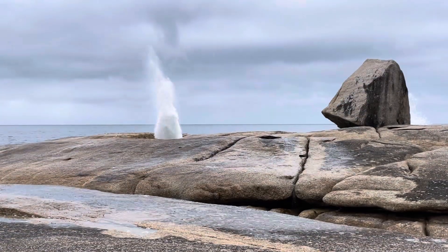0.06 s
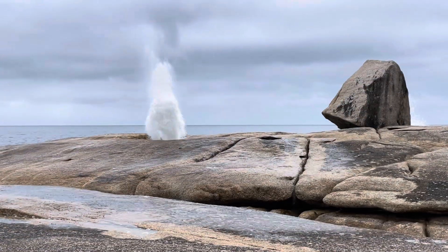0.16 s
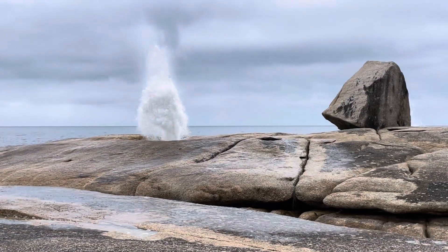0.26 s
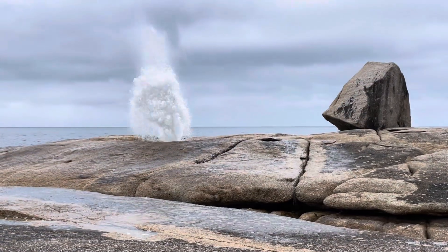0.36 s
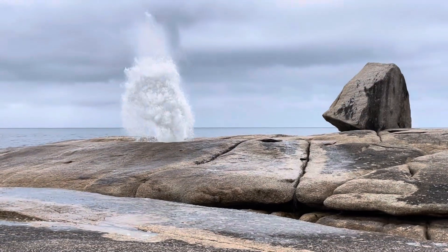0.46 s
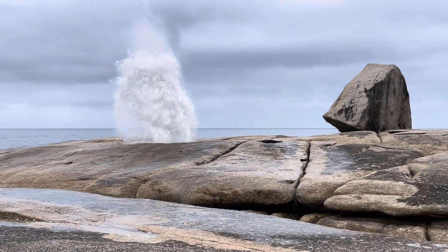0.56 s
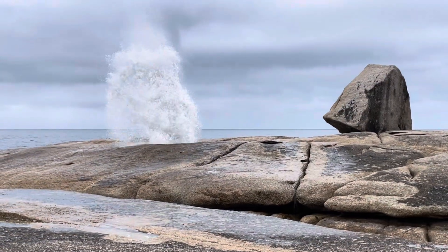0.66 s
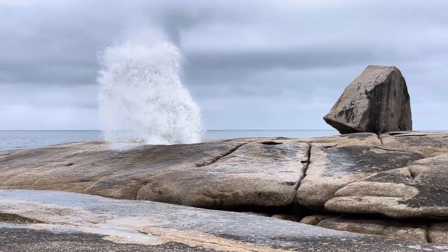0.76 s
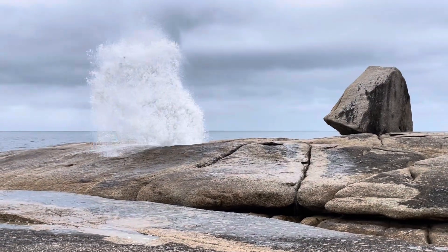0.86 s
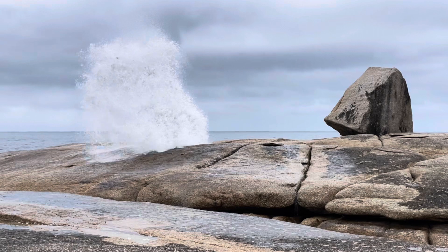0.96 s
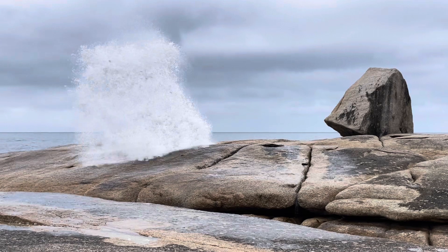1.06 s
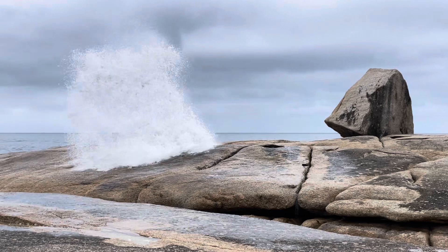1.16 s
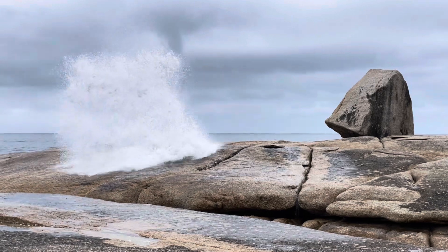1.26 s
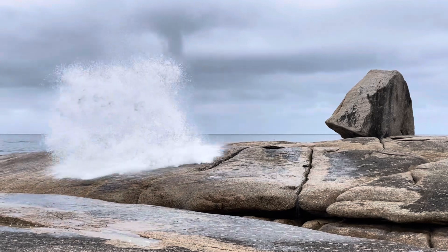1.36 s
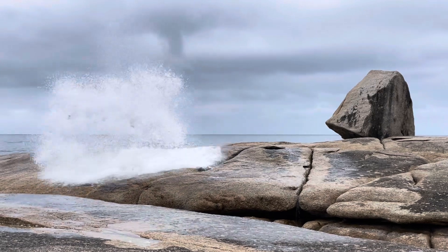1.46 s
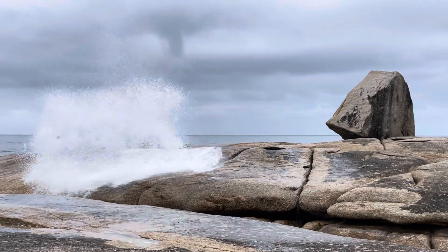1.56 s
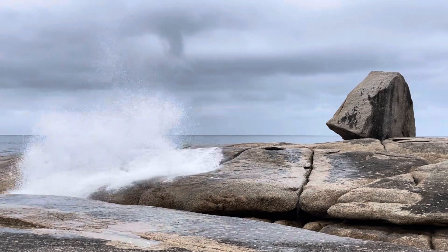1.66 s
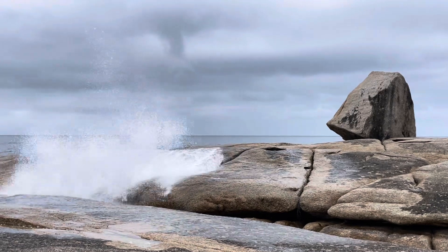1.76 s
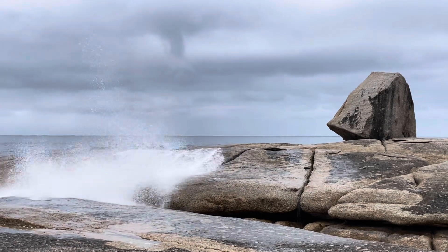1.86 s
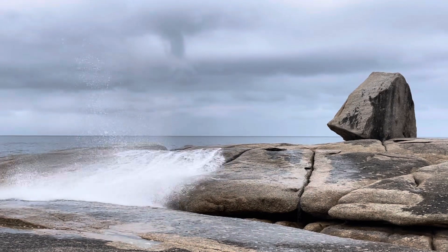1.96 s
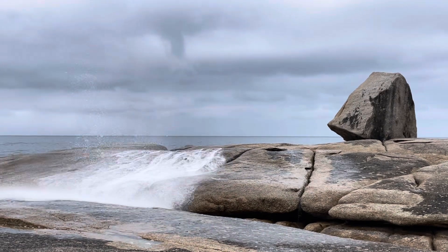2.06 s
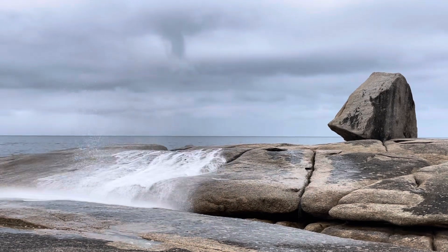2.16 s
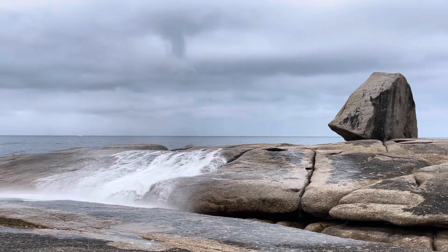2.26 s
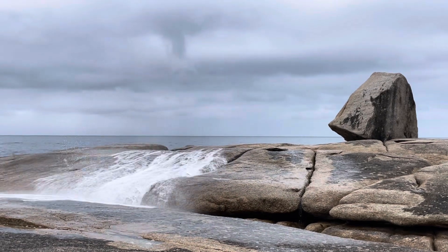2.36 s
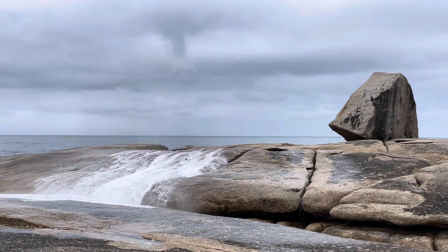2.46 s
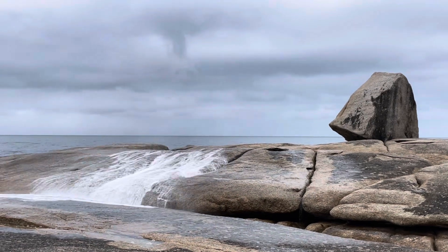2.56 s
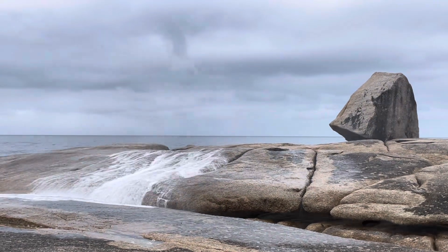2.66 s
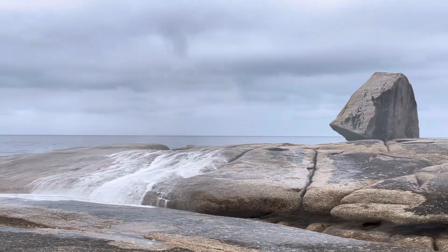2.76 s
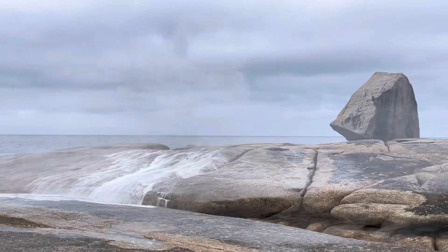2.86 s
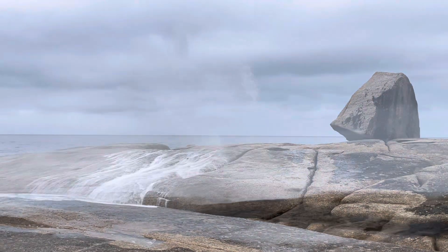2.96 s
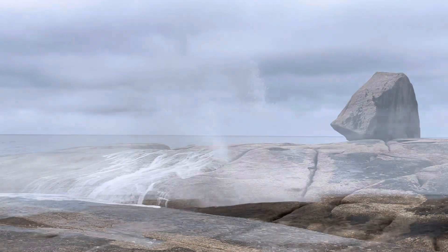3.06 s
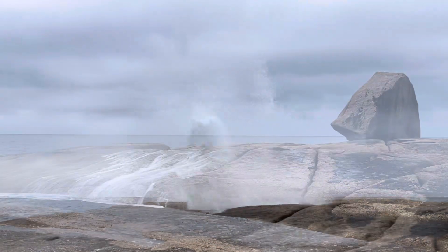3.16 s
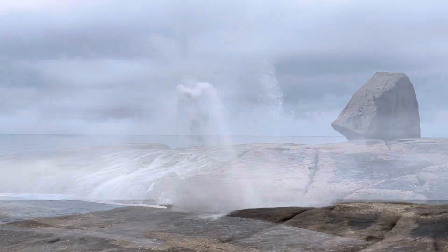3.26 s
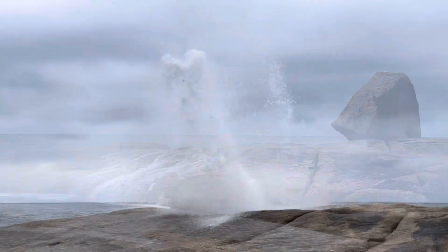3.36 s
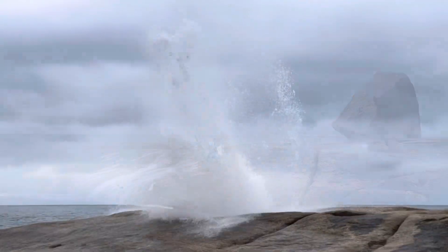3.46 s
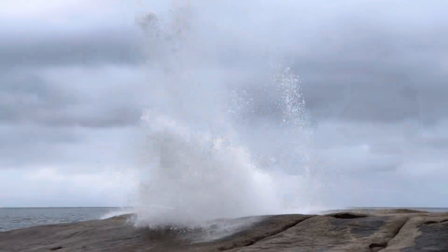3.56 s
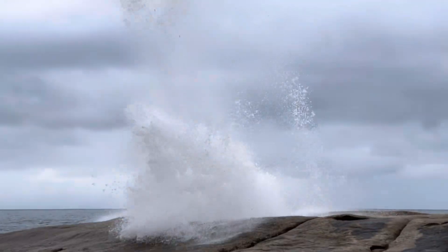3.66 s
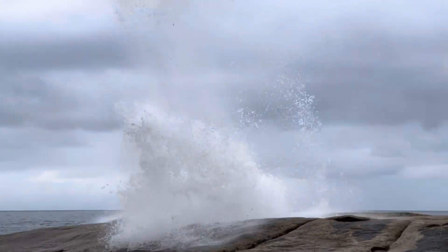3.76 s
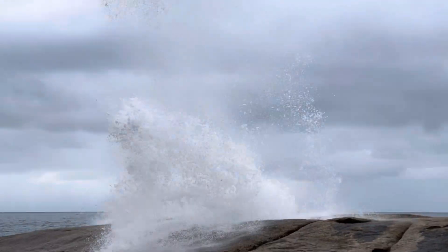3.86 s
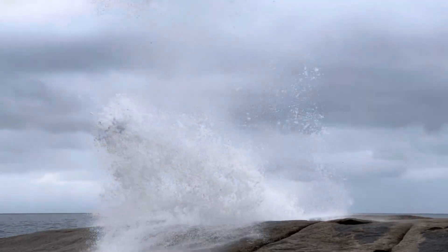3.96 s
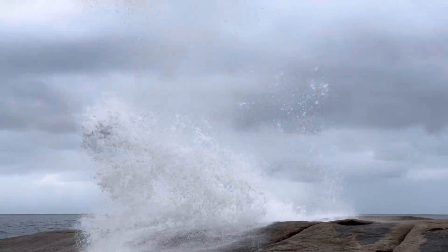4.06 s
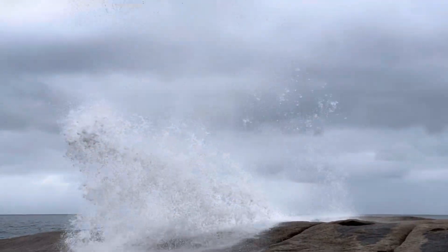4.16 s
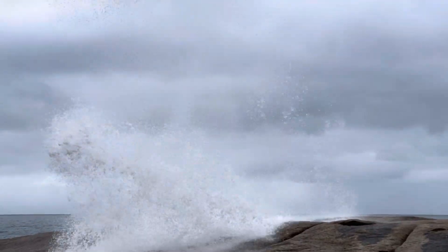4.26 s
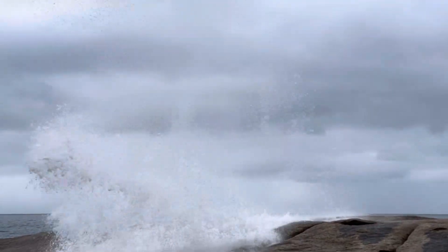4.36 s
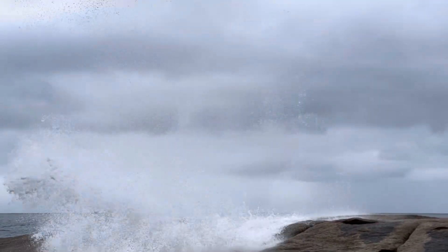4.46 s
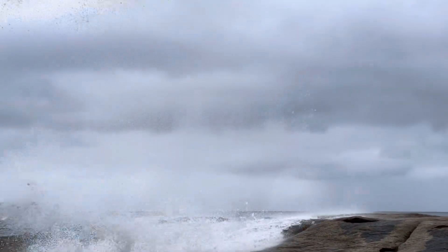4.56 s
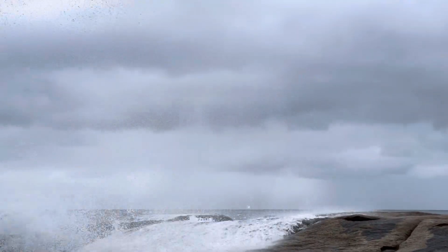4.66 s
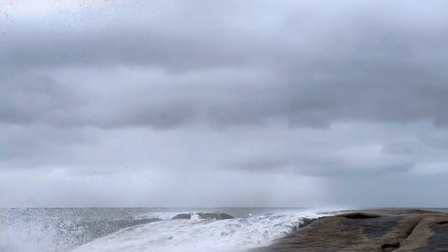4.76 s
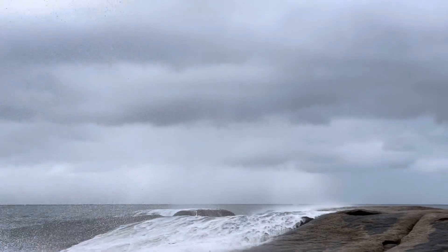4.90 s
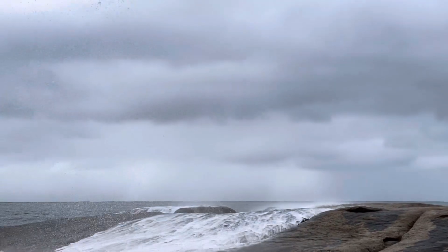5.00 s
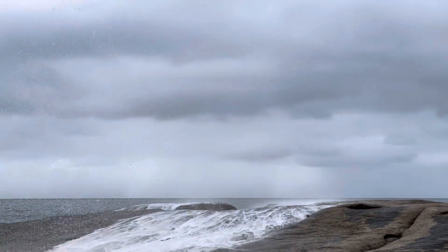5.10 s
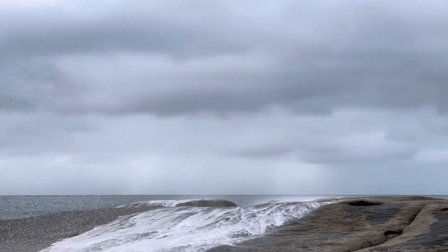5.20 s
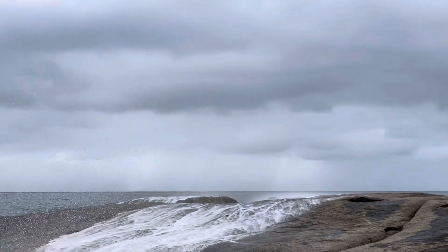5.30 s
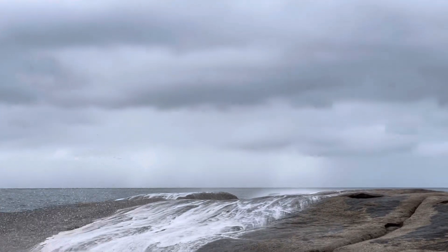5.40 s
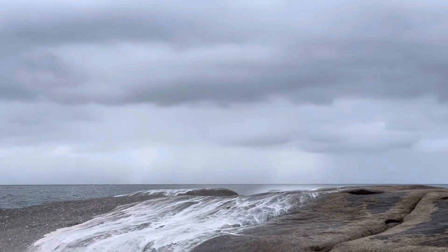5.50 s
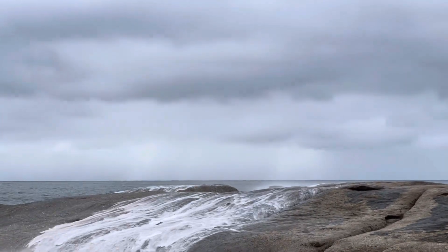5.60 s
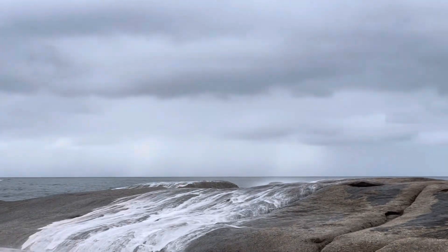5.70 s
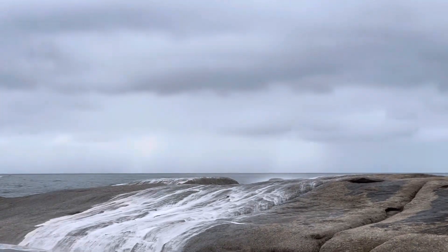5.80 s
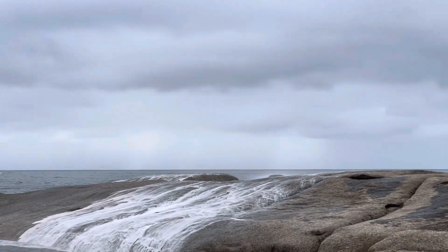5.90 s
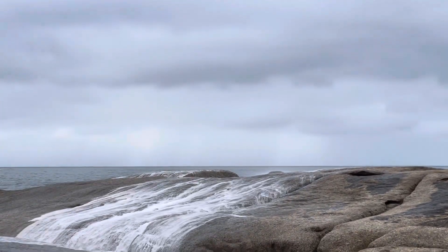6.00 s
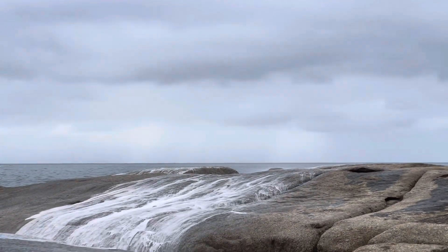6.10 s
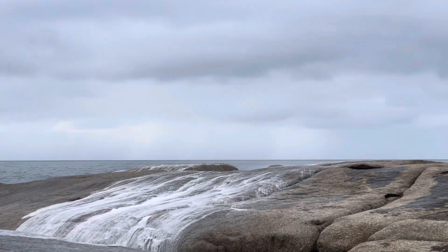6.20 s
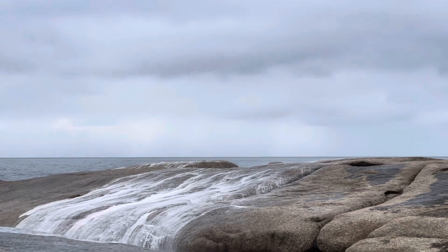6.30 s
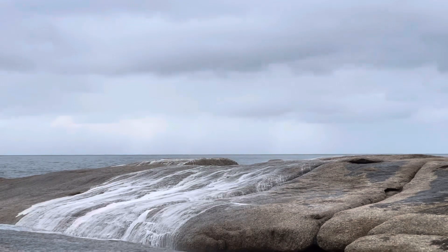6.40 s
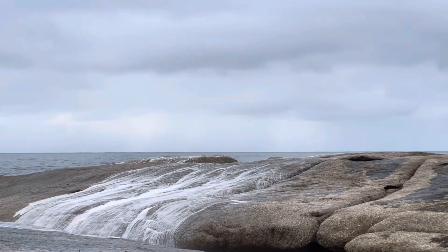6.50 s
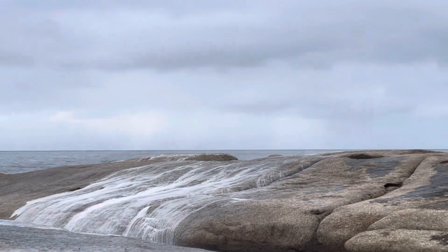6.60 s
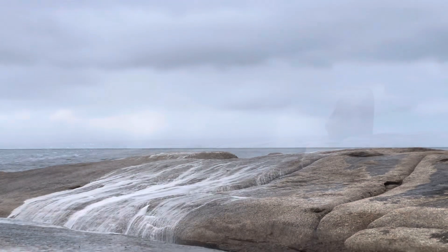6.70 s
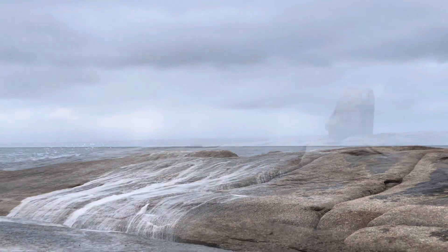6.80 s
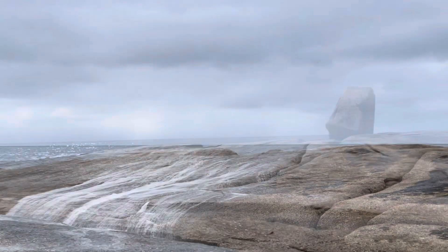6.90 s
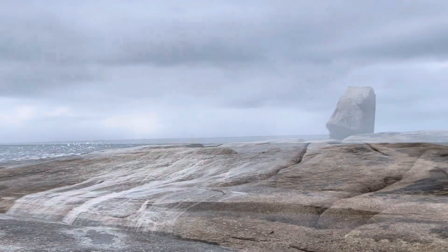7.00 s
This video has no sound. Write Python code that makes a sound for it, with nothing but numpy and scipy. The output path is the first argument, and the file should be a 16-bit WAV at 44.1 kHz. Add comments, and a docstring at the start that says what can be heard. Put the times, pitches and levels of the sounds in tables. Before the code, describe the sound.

Distant surf roars softly under low wind thuds. A surge booms in a rock cleft, then thrown water falls as heavy slaps, coarse patter and bright hiss before draining. After a gusty lull another surge rumbles, air pockets gulp, and a broad splash comes down. Foamy run-off fades with a few crisp close drops. Outdoors, closely spaced stereo microphones, no echo.

```python
"""Blowhole on a granite shore

A blowhole spouts twice over the roar of the sea, which is shaped noise that slowly eases off.
Surges rumble in the cleft; lumps slap down, drops spatter and fine spray hisses, as noise mixed with
clicks and ringing bubbles. Foam fizzes, run-off drains away, air gulps and single fat drops smack the rock.
Gusts of low noise buffet a closely spaced pair of microphones."""
import sys
import numpy as np
from scipy import signal
from scipy.fft import rfft, irfft, next_fast_len
from scipy.io import wavfile
from scipy.ndimage import uniform_filter1d

SR = 44100
rng = np.random.default_rng(int(sys.argv[2]) if len(sys.argv) > 2 else 0)


def digitize_waveform(pressure):
    """Quantize a signal to 16-bit integers and store it at the path in sys.argv[1].

    Rows of a 2-D input are taken as channels; values are limited to [-1, 1].
    """
    field = np.atleast_2d(pressure).T
    bounded = np.clip(field, -1, 1)
    quanta = np.round(bounded * 32767).astype(np.int16)
    wavfile.write(sys.argv[1], SR, quanta)


N = 310596
STEP_S = .002
CLOCK = np.arange(0, N / SR + STEP_S, STEP_S)   # the times at which levels are worked out, in seconds


def from_db(db):
    """Decibels to gain."""
    return 10 ** (np.asarray(db) / 20)


def to_db(power):
    """A power on the clock to decibels at every sample."""
    return np.interp(np.arange(N) / SR, CLOCK, 10 * np.log10(power + 1e-12))


def rms_one(x):
    """Scale to unit power."""
    return x / np.sqrt(np.mean(x ** 2) + 1e-20)


def per_bin(points):
    """A table over log frequency, read at every FFT bin."""
    hz, value = np.transpose(points)
    bin_hz = np.fft.rfftfreq(next_fast_len(N), 1 / SR)
    return np.interp(np.log(bin_hz + 1), np.log(hz), value)


def filtered(x, response):
    """Apply a frequency response."""
    size = next_fast_len(N)
    return irfft(rfft(x, size) * response, size)[..., :N]


def coloured(x, spectrum):
    """Filter a sound by a spectrum in dB, then scale to unit power."""
    return rms_one(filtered(x, from_db(per_bin(spectrum))))


def drift(rate):
    """Smooth chance of spread 1 that changes about rate times a second."""
    hold = 40   # samples between slow points
    r = np.exp(-2 * hold * np.pi * rate / SR)
    noise = rng.standard_normal(N // hold + 2002)
    slow = signal.lfilter([1], [1, -2 * r, r * r], noise)[2000:]   # skip the filter's settling
    return np.interp(np.arange(N) / hold, np.arange(len(slow)), rms_one(slow))


def swell(peak_s, rise_s, fall_s, hold_s=0):
    """Power that rises to 1, holds and dies away; it is 10 dB down after rise_s or fall_s."""
    shape = 1.53   # 1 = pointed top, 2 = bell
    t = CLOCK - peak_s
    away = np.maximum(-t / rise_s, 0) + np.maximum((t - hold_s) / fall_s, 0)
    return 10 ** -np.minimum(away ** shape, 20)


def wash():
    """Two unrelated noises: countless events merged."""
    return rng.standard_normal((2, N))


def ring(clicks, hz, t60):
    """Each click sets a sine ringing that falls 60 dB in t60 seconds; a unit click starts it at height 1."""
    r = np.exp(-np.log(1000) / (t60 * SR))
    w = 2 * np.pi * min(hz, SR / 2 - 1) / SR
    return signal.lfilter([0, np.sin(w)], [1, -2 * r * np.cos(w), r * r], clicks + 1e-18)


def impacts(per_s, spread_db):
    """Two unrelated rains of clicks: many small, a few large."""
    sizes = from_db(spread_db * np.minimum(rng.exponential(1, (2, N)), 4))
    signs = rng.choice([-1, 1], (2, N))
    return sizes * signs * (rng.random((2, N)) < per_s / SR)


def bubbles(per_s, spread_db, low_hz, high_hz, cycles, count):
    """Impacts trap air: each rings for some cycles at one of many pitches."""
    clicks = impacts(per_s, spread_db)
    dealt = rng.integers(0, count, N)   # which pitch each click gets
    pitches = np.geomspace(low_hz, high_hz, count)
    return rms_one(sum(hz * ring(clicks * (dealt == k), hz, cycles / hz) for k, hz in enumerate(pitches)))


def sea():
    """Distant surf: noise of falling spectrum, slowly heaving and easing off."""
    # Each row: frequency in Hz, relative level in dB per Hz.
    surf_spectrum = [(50, -11), (100, 0), (170, 2), (280, -6.5), (450, -16), (800, -17), (1200, -21.5),
                     (1800, -26), (3000, -28), (4800, -55), (8000, -75), (13500, -45), (16000, -59)]
    start_db, eases_db_per_s = -43.5, 0.28
    level_db = start_db - eases_db_per_s * np.arange(N) / SR + 0.26 * drift(0.16)
    return coloured(wash(), surf_spectrum) * from_db(level_db)


def cleft():
    """Air and water churn in the rock channel with each surge."""
    # Spectrum of the churn. Each row: frequency in Hz, relative level in dB per Hz.
    rumble_spectrum = [(50, -9), (100, 5), (160, 4.5), (280, 1.5), (450, -1.5), (700, -7), (950, -13.5),
                       (1400, -22), (2500, -31), (8000, -85)]
    # Waves surge through. Each row: peak in seconds, level in dB, rise and fall in seconds over 10 dB.
    surges = [(0.03, -37.5, 0.33, 2.4), (1.0, -33.5, 0.26, 0.58), (1.64, -37, 0.13, 3.5),
              (3.401, -35.5, 0.12, 1.1), (4.17, -32, 0.46, 0.94), (5.25, -36, 1, 2.3)]
    level_db = to_db(sum(from_db(db) ** 2 * swell(s, rise, fall) for s, db, rise, fall in surges))
    return coloured(wash(), rumble_spectrum) * from_db(level_db + .5 * drift(36))


def wind_level():
    """Short gusts ride on an unsteady breeze that slowly eases; dB."""
    # Gusts hit the microphones. Each row: start of full strength in seconds, its length in seconds, level in dB.
    gusts = [(0.005, 0.016, -25.5), (0.057, 0.027, -31.5), (0.352, 0.039, -35), (0.473, 0.045, -41),
             (0.734, 0.022, -34), (0.872, 0.23, -42.5), (1.147, 0.052, -34), (1.219, .03, -29),
             (1.638, .03, -34), (1.778, 0.027, -39), (2.11, .035, -35), (2.935, .1, -32.5),
             (3.04, .022, -28), (3.074, .05, -29), (3.152, .08, -32), (3.26, .025, -38), (3.363, 0.46, -41),
             (4.155, 0.036, -36), (4.413, 0.029, -30), (4.485, 0.058, -35), (5.603, 0.051, -38.5),
             (6.043, 0.021, -37), (6.86, 0.06, -36.5)]
    attack_s, release_s = 0.0051, 0.014   # over 10 dB
    start_db, swing_db, eases_db_per_s = -45, 4.5, 0.4
    breeze_db = start_db + swing_db * drift(4.4) - eases_db_per_s * np.arange(N) / SR
    gusts_db = to_db(sum(from_db(db) ** 2 * swell(s, attack_s, release_s, length) for s, length, db in gusts))
    return 20 * np.log10(np.hypot(from_db(breeze_db), from_db(gusts_db)))


def wind():
    """Eddies thump on both ports at once; stronger gusts shed larger, deeper eddies."""
    # Spectrum of the small eddies. Each row: frequency in Hz, relative level in dB per Hz.
    buffet_spectrum = [(15, -35), (28, -38), (40, -1.5), (62, 16), (80, 10.5), (120, -8.5), (300, -31.5),
                       (2000, -100)]
    level_db = wind_level()
    small = coloured(wash(), buffet_spectrum)
    large = coloured(wash(), [(0.84 * hz, db) for hz, db in buffet_spectrum])
    eddies = small + large * from_db(1.5 * (level_db - level_db.max()) + 1.5)
    # even out the eddies' own ups and downs, so that the level follows the gusts
    swing = np.abs(signal.hilbert(eddies, next_fast_len(N))[:, :N])
    strength = np.sqrt(uniform_filter1d(swing ** 2 / 2, size=1800, axis=-1) + 1e-9)
    return eddies / strength * from_db(level_db)


def landing_water():
    """Levels of masses, drops, spray and foam in dB: the falls add up, then run off and leave foam."""
    # Thrown water comes down on the rock. Each row: peak in seconds, rise and fall in seconds over 10 dB,
    # then heavy masses, coarse drops and fine spray in dB.
    falls = [(0.87, 0.29, 0.25, -68, -49, -52.5), (0.94, 0.063, 0.74, -47, -43, -41.5),
             (1.25, 0.26, 0.54, -39, -41.5, -37), (1.52, 0.28, 0.27, -36, -39, -37),
             (1.85, 0.23, 0.31, -38, -36.5, -30.5), (2.01, 0.22, 0.215, -34.3, -43, -41),
             (2.17, .1, 0.098, -51, -48, -41), (2.44, 0.29, 0.23, -44.5, -66, -50.5),
             (2.62, 0.12, 0.083, -50, -54, -55.5), (3.27, 0.245, 0.62, -46.5, -50.5, -55),
             (3.62, 0.38, 0.95, -52, -47, -48), (4.31, 0.736, 0.76, -35.5, -40, -38.5),
             (4.76, 0.45, 0.49, -36, -39, -33.5), (4.848, 0.11, 0.11, -39, -38, -35),
             (5.429, 0.47, 0.25, -45.5, -40, -29), (5.65, 0.2, 0.11, -48.5, -51, -33.5),
             (5.79, 0.054, 0.035, -60, -59, -44)]
    # Water drains off the rock. Each row: peak in seconds, sloshing in dB, fizz in dB.
    run_off = [(0.25, -49, -55.5), (2.299, -48.5, -60.5), (5.75, -50.5, -62.5)]
    run_off_rise_s, run_off_fall_s = 0.88, 1.57   # over 10 dB
    run_off_drops_db = -7.5   # relative to the sloshing
    foam_db, foam_life_s = -15, 0.1   # relative to the spray whose level it follows; time constant
    heavy, coarse, fine = sum(np.outer(from_db(db) ** 2, swell(s, rise, fall)) for s, rise, fall, *db in falls)
    sloshing, fizz = sum(
        np.outer(from_db(db) ** 2, swell(s, run_off_rise_s, run_off_fall_s)) for s, *db in run_off)
    keep = np.exp(-STEP_S / foam_life_s)
    froth = from_db(foam_db) ** 2 * signal.lfilter([1 - keep], [1, -keep], fine)
    coarse_and_run_off = coarse + sloshing * from_db(run_off_drops_db) ** 2
    return to_db(heavy + sloshing), to_db(coarse_and_run_off), to_db(fine + fizz), to_db(froth)


def masses(level_db):
    """Sheets of water slap down and fold in large bubbles."""
    # Each row: frequency in Hz, relative level in dB per Hz.
    slap_spectrum = [(150, -33), (400, -2.5), (700, 2), (900, 3.5), (1400, 0.5), (1900, -2.5), (2500, -5.5),
                     (3500, -7.5), (10000, -43)]
    gurgle = bubbles(per_s=1800, spread_db=1.5, low_hz=531, high_hz=2434, cycles=18.6, count=18)
    water = wash() + from_db(-9.0) * gurgle
    return coloured(water, slap_spectrum) * from_db(level_db + 1.1 * drift(18))


def drops(level_db):
    """Coarse drops smack the rock in clumps, more of them the harder the fall."""
    # Each row: frequency in Hz, relative level in dB per Hz.
    spatter_spectrum = [(150, -41), (700, -43), (1400, -5), (2100, -4), (2800, -1), (3700, -1.5),
                        (4400, -3.5), (6000, -9), (12000, -55)]
    per_s = 6000 * from_db(.6 * (level_db - level_db.max()))
    knocks = bubbles(per_s, spread_db=0.5, low_hz=1540, high_hz=7600, cycles=7.5, count=16)
    water = from_db(2.5) * wash() + knocks
    return coloured(water, spatter_spectrum) * from_db(level_db + 0.76 * drift(20))


def spray(level_db):
    """Fine droplets tick on wet stone, so thickly that they hiss."""
    # Each row: frequency in Hz, relative level in dB per Hz.
    spray_spectrum = [(300, -45), (1500, -36), (3000, -4.5), (4300, -2.5), (5300, 0.5), (6600, 1.5),
                      (7500, 1.5), (9000, -8.5), (10300, 0.5), (11700, -4.5), (13700, -2.5), (14800, -11.5),
                      (16000, -5)]
    ticks = rms_one(impacts(per_s=5600, spread_db=0.0))
    water = from_db(-5.0) * wash() + ticks
    return coloured(water, spray_spectrum) * from_db(level_db + .5 * drift(15))


def foam(level_db):
    """Tiny bubbles burst all over the wet rock, so many that they merge into noise."""
    # Each row: frequency in Hz, relative level in dB per Hz.
    foam_spectrum = [(1500, -37), (3000, -17), (6600, -9), (9000, -14), (10300, 2), (13700, 6), (16000, -5)]
    return coloured(wash(), foam_spectrum) * from_db(level_db)


def smacks(rows):
    """Fat drops hit wet rock with a short snap of ringing modes; the modes scale with each drop's pitch."""
    # Modes of the snap. Each row: frequency in Hz at pitch 1, level in dB, decay by 60 dB in seconds.
    smack_modes = [(1300, -8, .005), (1850, -3.5, .006), (2800, -5, .006), (3700, -11, .004),
                   (4500, -8, .003), (5900, -14, .002)]
    top_hz = 7000
    out, click = np.zeros(N + SR), signal.unit_impulse(SR // 50)
    for s, drop_db, pitch in rows:
        smack = sum((-1) ** k * ring(click * from_db(drop_db + db), hz * pitch, t60)
                    for k, (hz, db, t60) in enumerate(smack_modes))
        out[round(s * SR):][:len(smack)] += smack
    return signal.sosfilt(signal.butter(2, top_hz, fs=SR, output="sos"), out[:N])


def crackle(level_db):
    """Fat drops stand out of the spatter at random, most often where it falls hardest."""
    most_per_s = 70
    over_spatter_db, spread_db, middle_pitch = 9.5, 3, 1.06   # pitch multiplies the smack's modes
    per_s = most_per_s * from_db(.5 * (level_db - level_db.max()))
    at = np.flatnonzero(rng.random(N) < per_s / SR)
    size, pitch = rng.uniform(-0.98, 1, (len(at), 2)).T
    drop_db = level_db[at] + over_spatter_db + spread_db * size
    return smacks(zip(at / SR, drop_db, middle_pitch * 2 ** (.5 * pitch)))


def splashes():
    """Each lump of water bursts into a cloud of bubbles of about one size, heard as a band of noise."""
    # Separate splashes, lower the larger the lump. Each row: peak in seconds,
    # rise and fall in seconds over 10 dB, pitch in Hz, level in dB.
    lumps = [(0.82, .04, .05, 1840, -47), (0.915, 0.019, 0.47, 2020, -43), (0.912, .012, 0.1, 3600, -41.5),
             (0.985, 0.04, 0.058, 600, -38.5), (0.99, 0.032, .04, 3970, -45),
             (1.13, 0.21, .13, 2350, -41.5), (1.13, 0.11, 0.09, 3180, -40), (1.28, 0.098, 0.1, 3070, -38.5),
             (1.38, 0.19, 0.08, 2430, -37.5), (1.462, 0.037, 0.084, 2870, -34),
             (1.84, .04, 0.046, 6500, -43), (1.86, .04, 0.093, 1540, -35.5), (2.02, 0.075, 0.16, 1620, -38),
             (2.2, 0.034, 0.021, 1900, -43.5), (3.43, 0.047, 0.037, 165, -34),
             (4.18, .045, 0.045, 410, -33), (4.22, 0.08, 0.1, 704, -37.5), (4.365, 0.07, 0.058, 850, -35.5),
             (4.44, 0.037, .06, 333, -46), (4.83, 0.048, 0.083, 3100, -40), (4.85, .1, 0.14, 2050, -37.5),
             (4.92, 0.064, 0.12, 1650, -36)]
    sharpness, bubbles_db = 2.5, 3.5   # Q of the band; bubbles' gain, beside a wash of unit power
    out = np.zeros((2, N))
    grain = wash() + from_db(bubbles_db) * rms_one(impacts(per_s=1500, spread_db=3.0))
    edge = np.exp(.5 / sharpness)
    for s, rise, fall, hz, db in lumps:
        band = signal.butter(2, [hz / edge, hz * edge], "band", fs=SR, output="sos")
        cloud = signal.sosfilt(band, grain)
        out += rms_one(cloud) * from_db(db + to_db(swell(s, rise, fall)))
    return out


def gulps():
    """Large pockets of air close off in the churn; each rings briefly and rises in pitch."""
    # Each row: start in seconds, starting pitch in Hz, peak level in dB.
    pockets = [(1.94, 346, -32), (4.136, 375, -34), (4.175, 395, -29), (4.256, 510, -27), (4.283, 360, -32),
               (4.32, 230, -28.5), (4.362, 900, -26), (4.394, 440, -26), (4.43, 360, -32),
               (4.503, 440, -29)]
    cycles, pitch_rise = 1.7, 0.026   # cycles to reach full strength; share the pitch rises in that time
    out = np.zeros(N)
    for s, hz, db in pockets:
        age = np.arange(SR // 8) / SR * hz / cycles   # 1 at full strength
        turns = cycles * (age + pitch_rise * age ** 2 / 2)
        out[round(s * SR):][:len(age)] += from_db(db) * age * np.exp(1 - age) * np.sin(2 * np.pi * turns)
    return out


def near_drops():
    """Single fat drops smack the rock close by."""
    # Each row: start in seconds, level in dB, pitch as a multiple of the smack's modes.
    close_drops = [(2.4030, -33, 1.0), (2.4047, -30, 1.0), (2.4877, -35, .8), (2.4958, -21.2, 1.02),
                   (2.5059, -29.5, .85), (2.510, -33, .85), (2.5348, -30.5, 1.0), (2.5380, -32, .9),
                   (2.6038, -31, 1.1), (2.6244, -33, 1.1), (2.666, -36, 1.1), (4.9706, -21, 1.0),
                   (5.5414, -22, 1.4), (5.8131, -28.5, 2.0), (5.8595, -38, 1.6)]
    return smacks(close_drops)


def microphones(field):
    """Both ports share most of the sound, shifted in phase; the rest reaches them in opposition."""
    # Each row: frequency in Hz, phase in radians by which left leads.
    port_phase = [(120, 0), (300, .2), (500, .36), (950, .48), (1400, 0), (2500, 0), (3200, .33),
                  (5170, .5), (5770, -1.6), (6720, -.6), (7150, -1.2), (7580, -2.4), (8100, -2.3),
                  (8350, -3.1), (9560, -3.3), (9820, -3.9), (12300, -5.5), (12700, -6), (13300, -2 * np.pi)]
    # Each row: frequency in Hz, likeness of the two ports from 0 (unrelated) to 1 (the same).
    port_likeness = [(60, .95), (250, .92), (550, .77), (1100, .88), (1500, .995), (2000, .999),
                     (2600, .985), (3300, .89), (7500, .8), (8400, .87), (11500, .72), (12500, .8),
                     (13300, .985), (14500, .995)]
    alike = np.clip(per_bin(port_likeness), 0, 1)
    turn = np.exp(.5j * per_bin(port_phase))   # half the phase on each side
    common = filtered(field[0], np.sqrt((1 + alike) / 2))
    apart = filtered(field[1], np.sqrt((1 - alike) / 2))
    return np.array([filtered(common + apart, turn), filtered(common - apart, turn.conj())])


def scene():
    """Sea, spout, falling water and wind at the microphones; fat drops are the same in both channels."""
    masses_db, drops_db, spray_db, foam_db = landing_water()
    churn = cleft() + gulps() + masses(masses_db) + splashes()
    rain = drops(drops_db) + spray(spray_db) + foam(foam_db)
    return microphones(sea() + churn + rain + wind()) + crackle(drops_db) + near_drops()


def record(dry):
    """A steep low-pass cuts off the top."""
    cutoff_hz = 15800
    return signal.sosfilt(signal.ellip(12, .1, 80, cutoff_hz, fs=SR, output="sos"), dry)


dry = scene()
out = record(dry)
digitize_waveform(out)
```